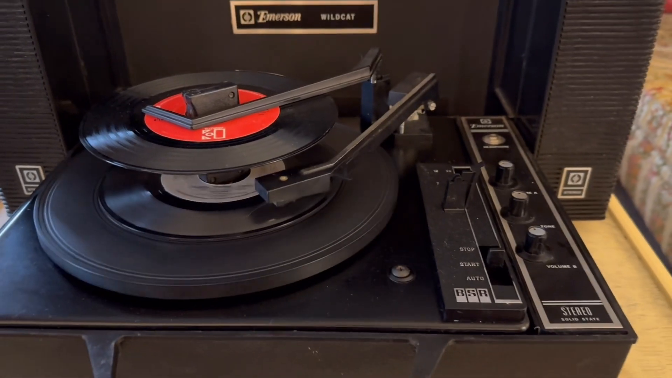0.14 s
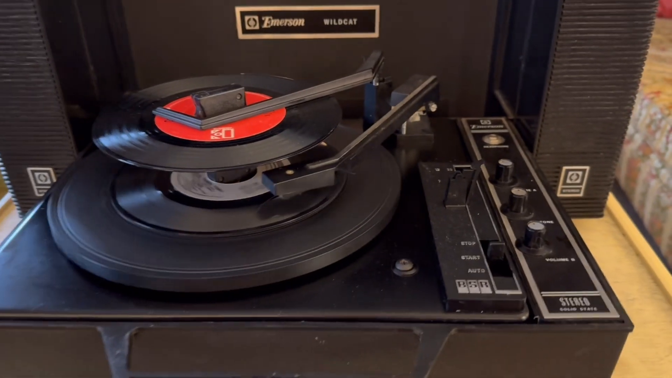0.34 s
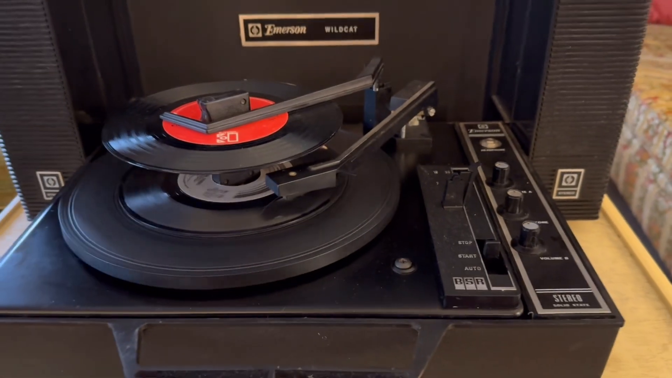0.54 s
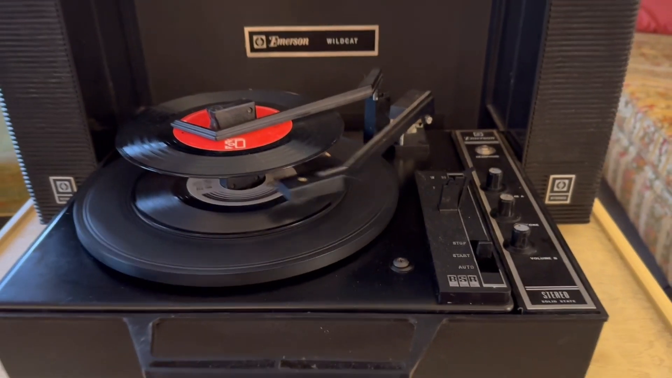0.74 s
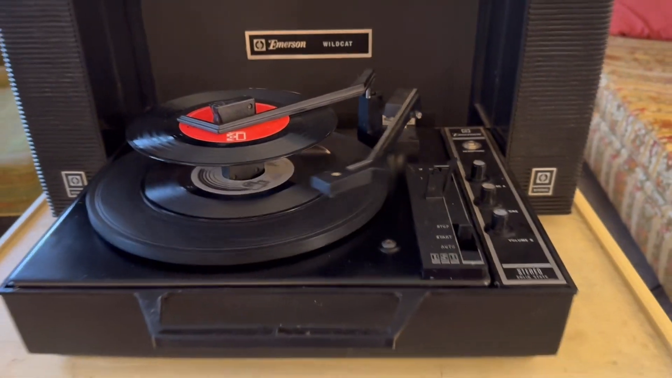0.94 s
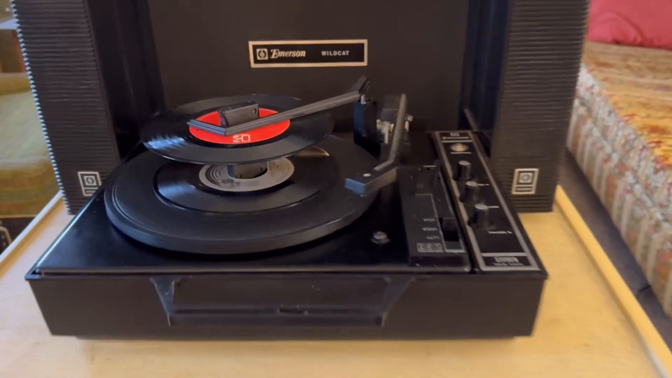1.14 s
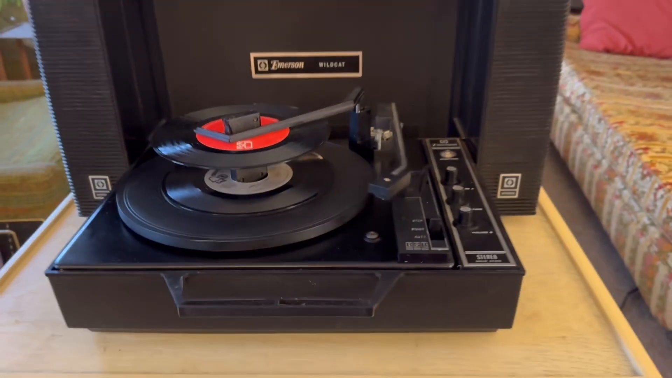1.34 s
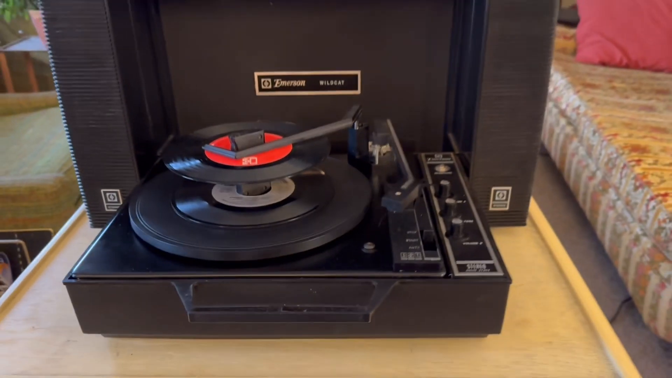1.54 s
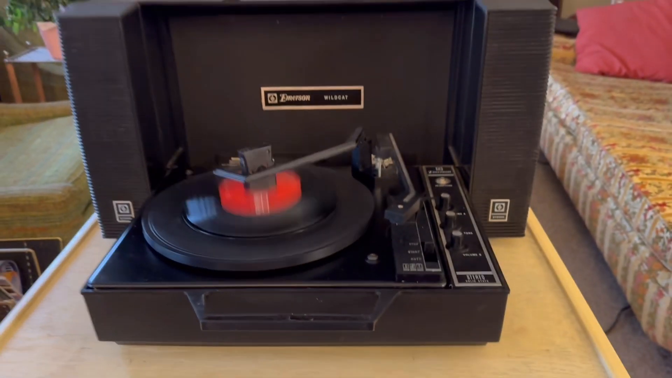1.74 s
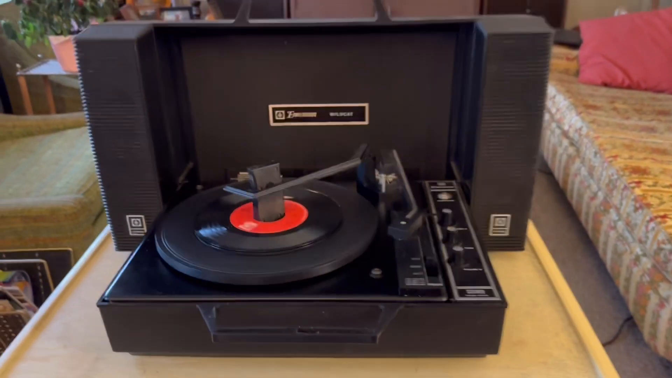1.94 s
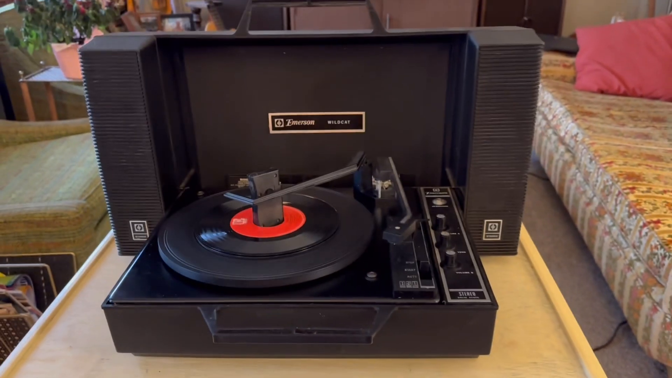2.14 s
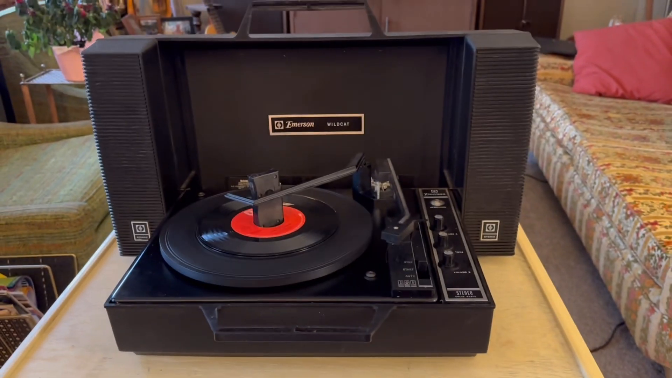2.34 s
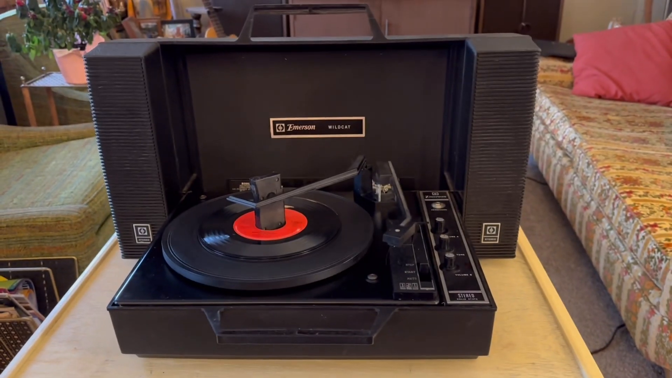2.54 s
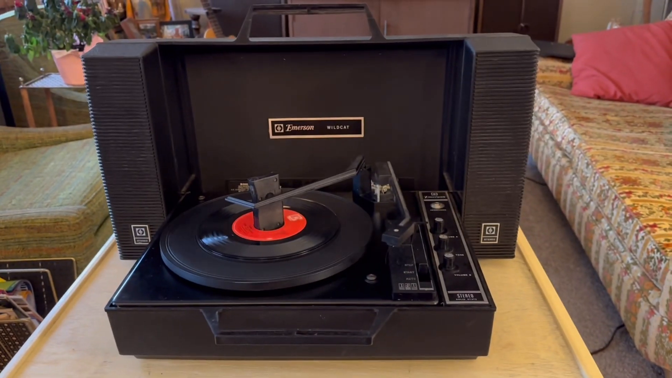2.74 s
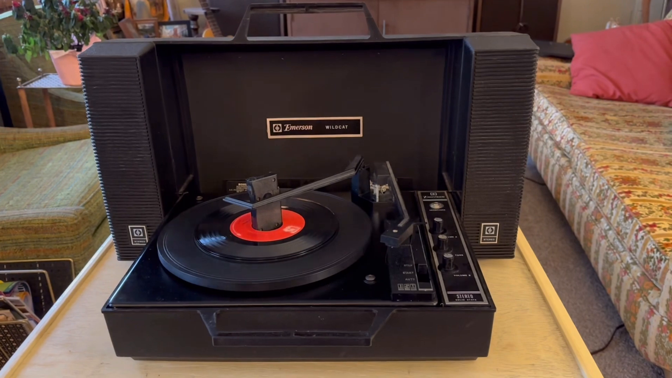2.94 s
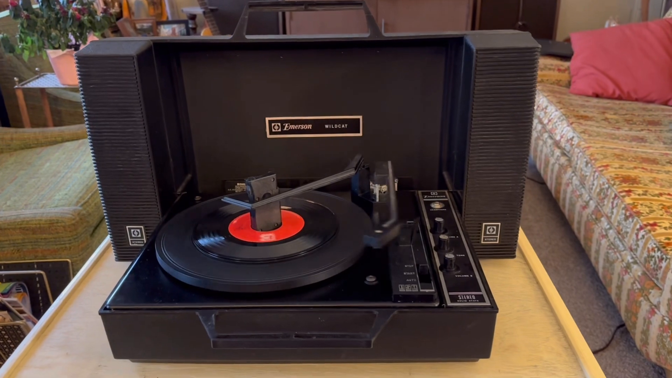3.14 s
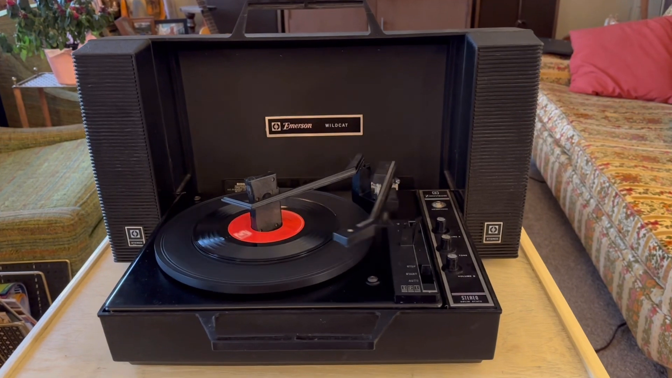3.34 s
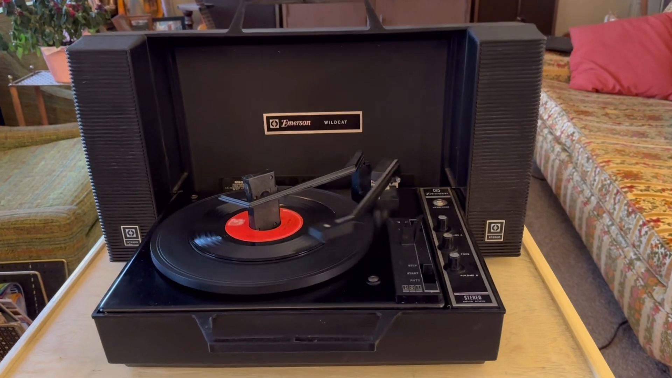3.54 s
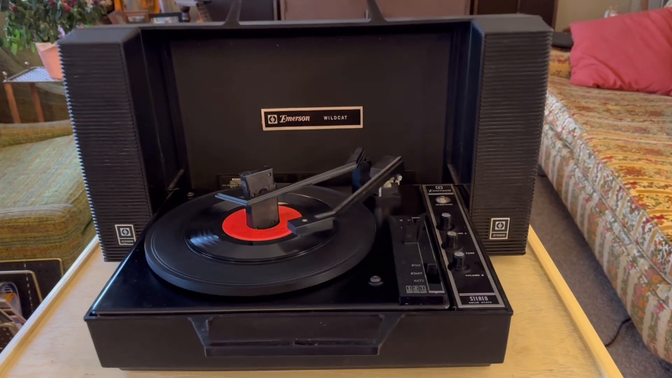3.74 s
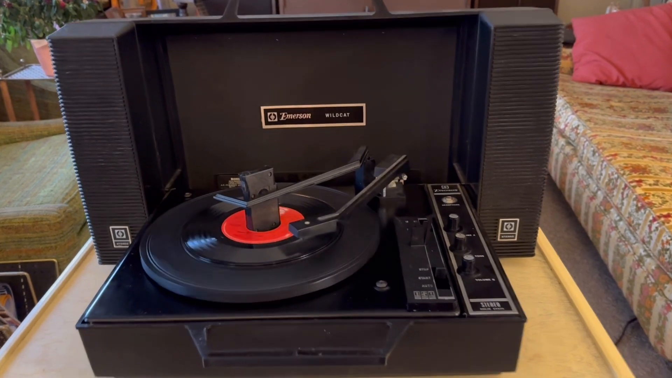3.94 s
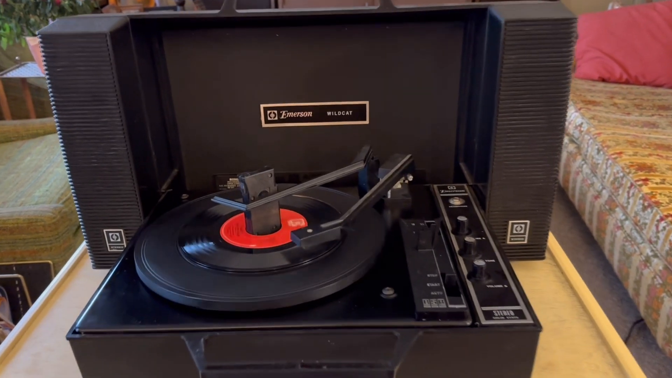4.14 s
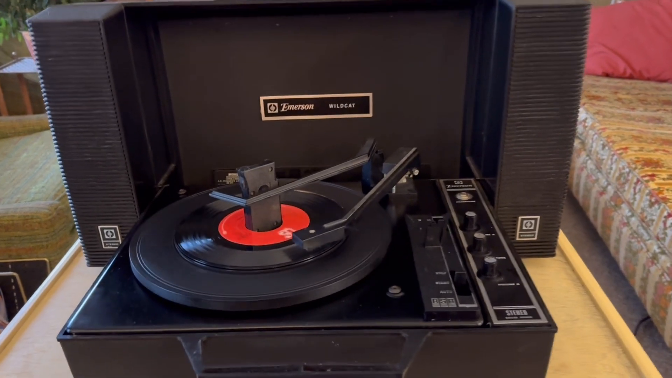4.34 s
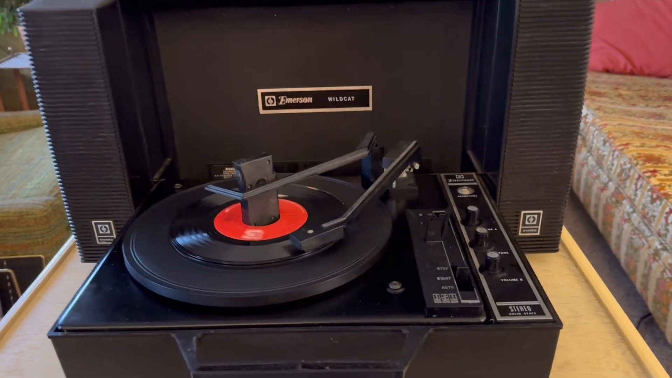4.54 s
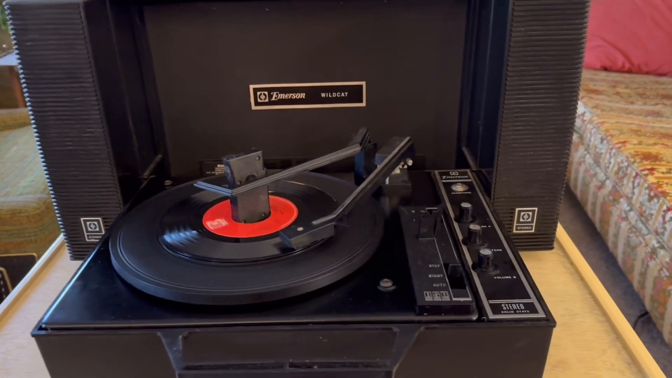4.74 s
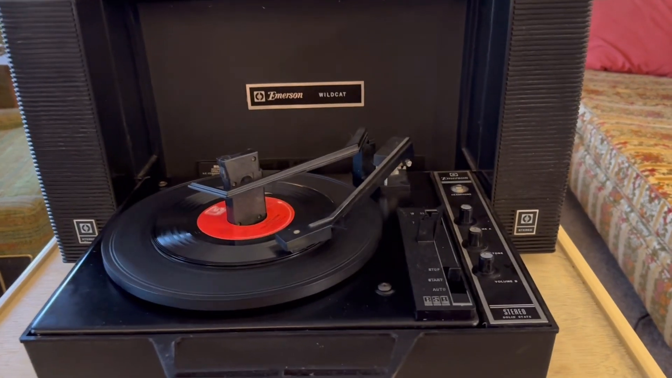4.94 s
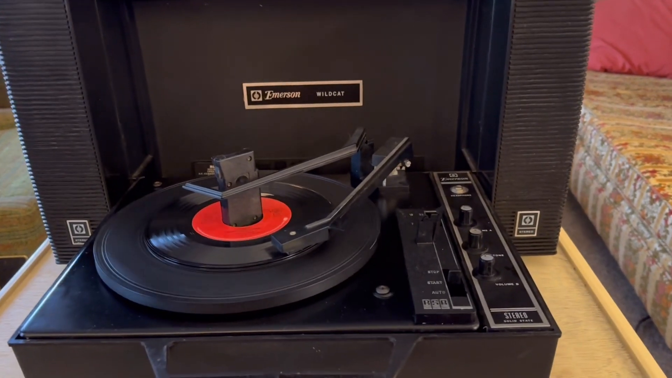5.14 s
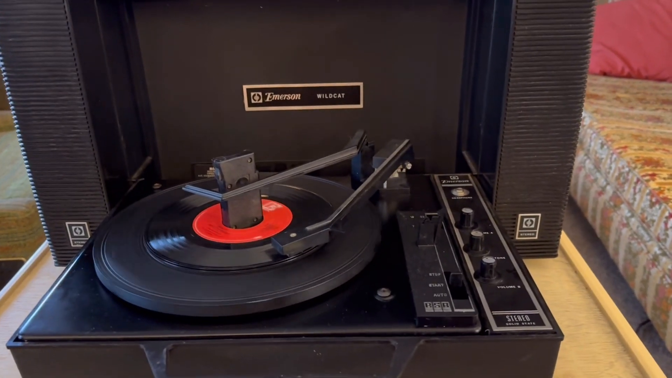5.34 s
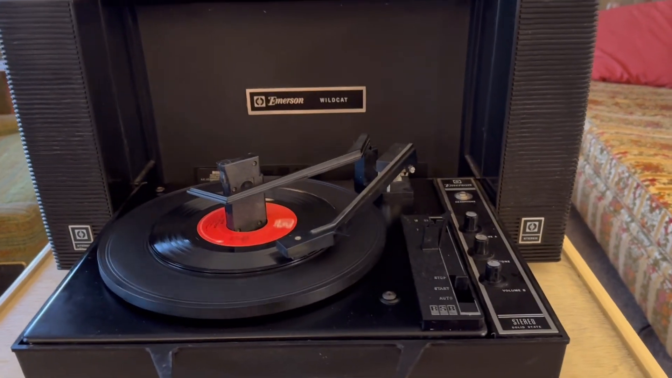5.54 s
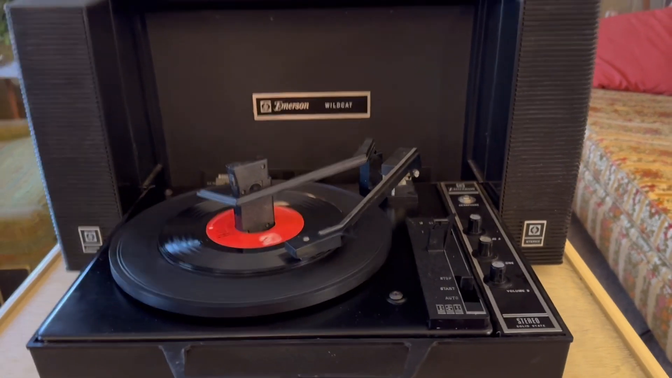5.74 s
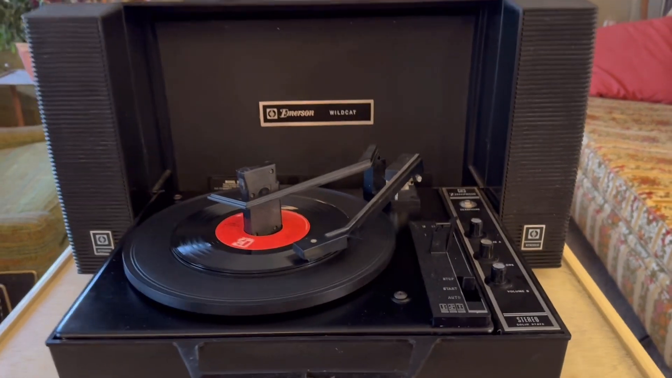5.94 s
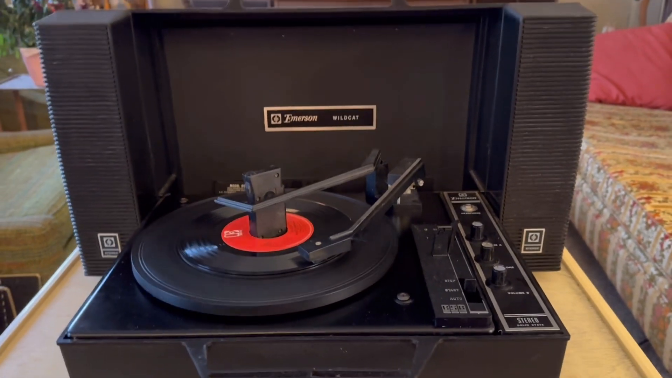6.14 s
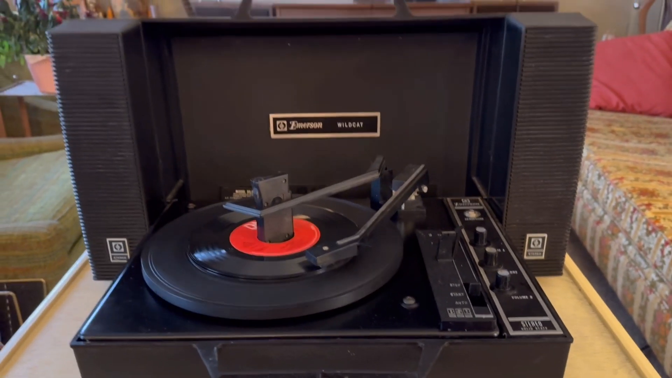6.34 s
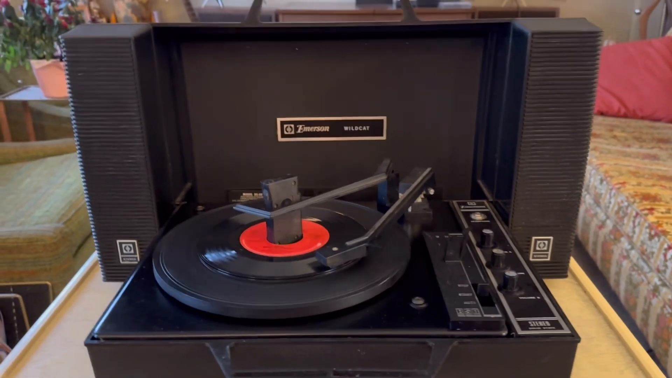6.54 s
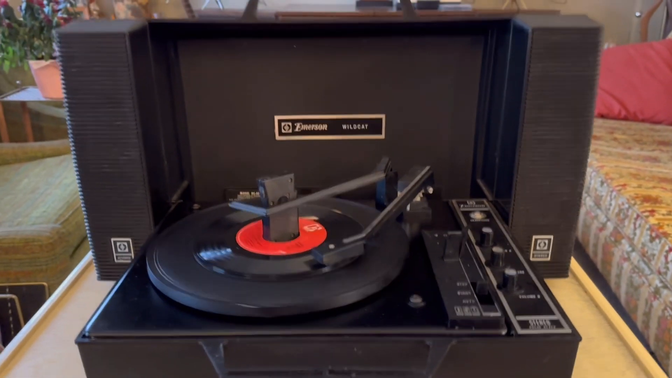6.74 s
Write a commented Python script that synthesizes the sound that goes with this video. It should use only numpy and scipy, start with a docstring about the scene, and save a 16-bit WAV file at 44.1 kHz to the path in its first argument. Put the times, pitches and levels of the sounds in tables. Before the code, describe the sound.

A record changer hums, drops a single with a loud clatter, then clicks and knocks until the stylus lands in faint crackle.

```python
"""A motor hums and its bearing hisses and whistles: a portable record changer in a living room, an arm's
length from a stereo microphone. Levers knock in the sprung deck, ringing its plate and case. A single
slaps onto the platter and chatters, the arm swings to its stop, and a gritty cam lowers it. The stylus
lands and scuffs along the lead-in groove, which hisses and crackles over the running motor."""
import sys
import numpy as np
from scipy import signal
from scipy.fft import rfft, irfft, next_fast_len
from scipy.io import wavfile
from scipy.ndimage import uniform_filter1d

SR = 44100
rng = np.random.default_rng(int(sys.argv[2]) if len(sys.argv) > 2 else 0)


def log_audio(samples):
    """Write samples as a 16-bit WAV file to the path given in sys.argv[1]."""
    # one column per channel
    frames = np.atleast_2d(samples).T
    # limit to full scale, then quantise
    limited = np.clip(frames, -1, 1)
    pcm = np.round(limited * 32767).astype(np.int16)
    wavfile.write(sys.argv[1], SR, pcm)


N = 298994
T = np.arange(N) / SR

# levers push the single off its ledge, turn the arm, stop it and drop it; hardness runs from 0 to 1:
# start_s, strength_db, hardness, thump_hz
LEVER_KNOCKS = [ (.803, -54.5, 0.73, 300), (1.037, -76, 0.9, 300), (1.5745, -43.5, 0.33, 238),
                (1.578, -40.5, 0.2, 233), (1.589, -47, 0.39, 229), (2.6707, -38.5, 0.58, 350),
                (2.676, -43, 0.38, 368), (2.699, -54, 0.31, 327), (3.067, -55, 0.45, 308),
                (3.086, -68, 0.96, 301), (3.283, -70.5, 0.9, 303.5), (3.715, -57.5, 0.28, 362.5),
                (4.081, -47, 0.6, 827), (4.087, -47, 0.77, 404), (4.094, -50, 0.24, 212),
                (4.469, -56, 0.9, 300), (4.511, -55, 1, 300), (4.555, -55, 0.27, 395),
                (4.576, -54, 0.98, 400), (4.64, -62, 0.8, 300), (4.727, -61, 1, 298),
                (4.9516, -51, 0.15, 290), (4.981, -51.5, 0.7, 300), (5.021, -49, 0.04, 235),
                (5.044, -55.5, 0.05, 240), (5.092, -56, 0.11, 260), (5.394, -57.5, 0.46, 410)]
# the single lands on the platter, then the stylus on the single; snap and plate are relative to strength:
# start_s, strength_db, hardness, thump_hz, snap_db, plate_db, clack_t60_s
LANDINGS = [ (1.6936, -40.5, 0.3, 400, -12.5, -0.5, .06), (1.7012, -33, 0.66, 290, -2, -1, 0.085),
            (1.7143, -22.5, 0.66, 640, -5.5, 3.5, 0.052), (1.718, -20.5, 0.28, 240, -19, -1.5, .06),
            (1.7276, -21.5, .63, 240, -7.5, 0, 0.068), (1.759, -36.5, 0.5, 292.2, 6, 0.5, .05),
            (1.7641, -16, 0.95, 347, -5.5, -10.5, .03), (1.773, -26, 0.7, 280, -17.5, -2, .03),
            (4.9938, -32.5, 0.44, 474, -2, -8, 0.044), (4.997, -32.5, 0.69, 1000, 2.5, -5.5, 0.096),
            (5.005, -43.5, 0.28, 302, 13, -0.5, 0.039)]
# the ledge, the single and the arm's linkage bounce:
# start_s, gap_s, first_strength_db, step_db, hardness, thump_hz, snap_db
RATTLES = [ (1.633, 0.012, -47, -4.5, 0.23, 214, -25), (1.681, 0.0047, -53.5, 4, 0.46, 290, -8.5),
           (1.795, 0.028, -44, -5, 0.95, 703, -8), (3.791, .028, -61.5, -1, 0.14, 245, -25)]
# what the case passes of a clack, and the colour of a hard contact: frequency_hz, gain_db
CASE_COLOUR = [(150, -29), (215, -1), (500, 3.5), (590, 0), (720, 5), (1400, -1), (2500, -2.5), (3300, -6),
               (5000, -4.5), (9000, -9.5)]
TICK_COLOUR = [(1200, -9), (2600, -1), (3300, -4.5), (4300, -6.5), (5400, 1), (7500, -6), (10000, 2.5),
               (13000, 0), (15500, -2)]
# modes of the deck plate and case, then of each part that sings after a blow: pitch_hz, level_db, t60_s
DECK_MODES = [(222, -9, 0.09), (242, 2, 0.085), (289, -6, 0.07), (323, -1, 0.095), (392, -16, .17),
              (454, -9, .17), (490, -17, 0.2), (525, -16, .15), (697, -7, 0.2), (866, -19, 0.2),
              (923, -7, 0.13), (979, -13, .17), (1020, -13, .14), (1060, -10, 0.14), (1135, -13, .15),
              (1328, -12, .18), (1472, -10, 0.23), (1633, -11, 0.2), (1765, -13, .13), (1888, -11, .12),
              (1995, -12, .16), (2330, -15, .16), (2480, -17, .18)]
PLATTER = [(105, -16, .6), (698, -1, .17), (770, -29.5, 1.9), (779, -37, .8)]
DISC = [(2654, 3, .03), (3068, -13.5, .25), (3380, -5.5, 0.11), (3730, -16.5, 0.19), (4270, -19, .17),
        (4960, -5, 0.051), (5290, 2, 0.038), (5828, -14.5, .1)]
CAM_LEVER = [(321, -5, 0.14), (408, 2.5, 0.14), (752, 2, 0.1), (910, -19.5, .15), (1217, -4, 0.12),
             (1557, 5, 0.03), (1790, -3, 0.13), (2330, -4, 0.063)]
TONE_ARM = [(402, -12.5, 0.22), (729, -1, 0.13), (914, -15, 0.12), (1136, -17, 0.14), (1600, -18, 0.11),
            (1980, -13, 0.06), (2120, -12, 0.06), (2837, -21, 0.078)]
PUSHER = [(1300, 2.5, 0.022), (1620, -13.5, .05)]
CARTRIDGE = [(490, -6, .15), (1260, 1, 0.083), (1450, -6, 0.095), (2350, -6, 0.078), (3278, -15, .09),
             (5600, 0, 0.085), (6940, -5, 0.089)]
PAWL = [(2840, -5, 0.033), (5270, -8, .03), (5430, -2, .025), (5860, -10, .025)]
# blows on those parts: start_s, modes, level_db
STRIKES = [(1.037, PAWL, -63), (1.573, PUSHER, -38), (1.631, PUSHER, -47), (1.719, PLATTER, -28.5),
           (1.7642, DISC, -31.5), (2.6708, CAM_LEVER, -43), (4.082, TONE_ARM, -35.5),
           (4.996, CARTRIDGE, -42), (3.086, PAWL, -69.5), (3.283, PAWL, -66)]
# the stylus scuffs the vinyl: start_s, length_s, rise_s, level_db, squeak_hz, tilt_db_per_octave
SCUFFS = [(5.088, 0.047, 0.0041, -54, 6650, 2.5), (5.156, 0.1, .01, -77, 8600, -1),
          (5.699, 0.026, 0.0088, -69.5, 8600, 4), (5.752, 0.062, 0.016, -79.5, 8650, 5),
          (5.873, 0.077, 0.02, -76.5, 8560, -9), (5.997, 0.045, 0.017, -76, 8600, 2),
          (6.413, 0.042, 0.011, -59.5, 5830, 0.5)]
# grit on the cam, then dust under the stylus: start_s, level_db, pitch_hz
POPS = [(4.751, -55, 6800), (4.768, -54, 5600), (4.851, -54, 9500), (5.547, -60, 6550), (5.79, -62, 8000),
        (6.0618, -46.5, 6900), (6.543, -55.5, 7600)]
# colours of the stylus in the groove, a dust pop and the rubbing cam: frequency_hz, gain_db
GROOVE_COLOUR = [(1200, -14), (2500, -2.5), (3900, -4), (5200, 2.5), (6600, 0), (8200, -5), (11500, -8.5),
                 (13300, -16), (15500, -25)]
POP_COLOUR = [(600, 5), (1800, 0), (3800, -21), (6800, 1.5), (9000, -11), (12000, -31), (16000, -30)]
CAM_COLOUR = [(700, 8), (1200, -2), (2100, 4), (2800, -4), (4400, -1.5), (6000, -3), (7800, -13),
              (10400, -4), (12000, -12), (13200, -10), (16000, -24)]
# motor tones: pitch_hz, level_db, waver_share
HUM_TONES = [(96, -70, 0.87), (96, -75.5, 0.41), (259.2, -60, 0.11), (327, -84, 0.6), (360.7, -79, 0.6),
             (415, -81, 0.55), (673, -85, 0.5), (727, -77.5, .6), (788, -83.5, .9)]
# load on the motor, which drives rumble and whirr: time_s, gain_db
MOTOR_LOAD = [(0, 0.5), (1.4, 0.5), (2.1, 3.5), (2.5, 0), (3.15, 2.5), (3.7, 0), (4.2, 3), (5.25, 4.5),
              (6, 4), (6.78, 3)]
# bearing resonances, hissing and whistling: pitch_hz, width_hz, level_db
BEARING_HISS = [(2843, 100, -86.5), (4860, 280, -86.5), (7100, 1100, -90.5), (10080, 730, -88),
                (13460, 5000, -89.5)]
BEARING_WHISTLE = [(2950, 50, -90), (4190, 70, -92), (4900, 110, -91), (6900, 800, -90.5), (9500, 260, -90),
                   (10300, 500, -91.5), (11180, 400, -92)]
# the hiss wanders; the whistle sinks as the cam loads the platter: time_s, gain_db
HISS_LEVEL = [(0, -1), (.7, -3), (1.05, 0.5), (1.4, -1.5), (2.1, 1), (2.6, -1), (3.1, -2), (3.35, -6),
              (3.9, -3), (4.3, 0), (4.75, 0), (5.5, -4.5), (6.3, -3), (6.78, -4.5)]
WHISTLE_LEVEL = [(0, -1.5), (.38, 0), (.72, -1), (.92, -7), (3.1, -13), (6.78, -15)]
# colours of platter rumble, motor whirr and still air: frequency_hz, gain_db
RUMBLE_COLOUR = [(10, -48), (22, -23.5), (35, -9.5), (50, 2.5), (85, 5), (125, 3), (180, -0.5), (235, 3),
                 (300, -6.5), (420, -9.5), (560, -23.5), (900, -47.5)]
WHIRR_COLOUR = [(300, -4), (520, 7.5), (760, 7.5), (900, 2), (1400, -2), (2000, -7), (3200, -21.5),
                (6000, -41.5)]
AIR_COLOUR = [(1500, 7), (4000, -1), (6500, 0.5), (8500, -3), (11000, -12), (15000, -6), (16000, -19.5)]
# the living room's decay: frequency_hz, t60_s
ROOM_DECAY = [(150, 0.28), (500, 0.3), (1500, 0.32), (4000, 0.34), (9000, 0.14), (15000, 0.17)]
# the microphone draws back, then leans in and hears less of the room: time_s, echo_db
ECHO_LEVEL = [(0, -2), (1.8, 0.5), (2.7, 2.5), (4.1, 3.5), (5, -4), (6.78, 0)]
# stereo width and left-right balance by frequency; the top treble is nearly mono:
# frequency_hz, side_minus_mid_db, left_minus_right_db
STEREO_IMAGE = [(59.57, -14.5, 2), (247.8, -10.5, 2.5), (750, -2, 2.5), (1440, -3, 6.5), (3100, -1.5, 1.5),
                (5300, -2, 5.5), (8740, 2, 1), (14260, -21, 0)]

LEFT_RIGHT = np.array([[1], [-1]])
GROOVE_FROM_S = 4.98


def deck(rise_s=.0003):
    """Each blow rings the plate's modes, with a thump, a clack of levers and plastic, and a contact snap."""
    out, t = np.zeros((2, N)), np.arange(SR * 2 // 3) / SR
    hz, db, t60 = np.transpose(DECK_MODES)
    # low modes build up more slowly; all sound a little sooner on the left
    modes = np.array([amp(d) * pan(f) * fade(t, decay, 2.5 / f)
                      * np.sin(2 * np.pi * f * (t + LEFT_RIGHT * 4e-5))
                      for f, d, decay in zip(hz, db, t60)])
    short, case, tick = t[:SR // 7], colour(CASE_COLOUR), colour(TICK_COLOUR)
    n = len(short)
    for start, db, hardness, thump_hz, snap_db, top_hz, plate_db, clack_t60 in blows():
        # a harder contact thumps less and clacks higher
        thump_db = db + between(26, -11, hardness)
        clack_hz = between(466, 1860, hardness)
        push = amp(thump_db + 1) * hump(hz, thump_hz, octaves=.45)
        push += amp(db - 11.5) * hump(hz, clack_hz, octaves=.95)
        add(out, start, amp(plate_db) * np.tensordot(push, modes, 1))
        # the first few cycles come straight from the struck part, ahead of the clatter
        ping = pan(clack_hz) * np.sin(2 * np.pi * clack_hz * short)
        add(out, start, amp(db + 3) * ping * fade(short, .01, rise_s))
        thump = noise(n, lambda f: case(f) * hump(f, .99 * thump_hz, octaves=.63), width_db=-2.5)
        clack = noise(n, lambda f: case(f) * hump(f, clack_hz, octaves=.81), width_db=-4)
        snap = noise(n, lambda f: tick(f) / (1 + (f / top_hz) ** 4), left_lead_s=1.2e-5)
        add(out, start, amp(thump_db - 10) * thump * fade(short, t60=.075, rise=.0025))
        add(out, start, amp(db - 4) * clack * fade(short, clack_t60, rise_s))
        add(out, start, amp(db + snap_db + .5) * snap * fade(short, .55 * clack_t60, rise_s))
    # the small case radiates no deep bass
    return signal.sosfilt(signal.butter(3, 150, "highpass", fs=SR, output="sos"), out)


def blows(lever_top_hz=5960, lever_plate_db=-1.5, lever_t60_s=.08, rattle_t60_s=.06):
    """Contacts: start_s, strength_db, hardness, thump_hz, snap_db, top_hz, plate_db, clack_t60_s."""
    top_hz = lambda snap_db: 14200 * 2 ** (snap_db / 12)  # a weaker snap is also duller
    for start, db, hardness, hz in LEVER_KNOCKS:
        snap_db = between(-36, -5, hardness)
        yield start, db, hardness, hz, snap_db, lever_top_hz, lever_plate_db, lever_t60_s
    for start, db, hardness, hz, snap_db, plate_db, t60 in LANDINGS:
        yield start, db, hardness, hz, snap_db, top_hz(snap_db), plate_db, t60
    for start, gap, db, step_db, hardness, hz, snap_db in RATTLES:
        for k in range(4):
            yield start + k * gap, db + k * step_db, hardness, hz, snap_db, top_hz(snap_db), 0, rattle_t60_s


def ringing_parts():
    """Struck parts ring on in their own modes, each building up over a cycle or so."""
    out, t = np.zeros((2, N)), np.arange(SR * 3 // 2) / SR
    for start, modes, level_db in STRIKES:
        for hz, db, t60 in modes:
            ring = fade(t, t60, rise=1.4 / hz) * np.sin(2 * np.pi * hz * t)
            add(out, start, amp(level_db + db) * pan(hz) * ring)
    return out


def stylus(release_s=.011, squeak_db=-6, rasp_db=-2.5):
    """The stylus scuffs grainily along the lead-in groove, with a slight squeak and a rasp from the cone."""
    out, t = np.zeros((2, N)), np.arange(SR // 4) / SR
    for start, length, rise, db, squeak_hz, tilt_db in SCUFFS:
        contact = (1 - np.exp(-(t / rise) ** 2)) * np.exp(-np.maximum(t - length, 0) / release_s)
        scrape = noise(len(t), lambda f: colour(GROOVE_COLOUR)(f) * amp(tilt_db * np.log2(1 + f / 1000)))
        squeak = noise(len(t), lambda f: hump(f, squeak_hz, octaves=.12))
        rasp = noise(len(t), lambda f: hump(f, 610, octaves=1))
        add(out, start, amp(db) * contact * (scrape + amp(squeak_db) * squeak + amp(rasp_db) * rasp))
    return out * amp(2 * walk(700) + 2 * walk(170))


def dust(specks_per_s=40, crackle_db=-76, spread_db=3.2):
    """Single dry pops of grit and dust, and a fine crackle once the stylus is in the groove."""
    out, t = np.zeros((2, N)), np.arange(SR // 30) / SR
    for start, db, hz in POPS:
        pop = noise(len(t), lambda f: colour(POP_COLOUR)(f * 6800 / hz))  # treble peak moved to hz
        add(out, start, amp(db + 2.5) * pop * fade(t, t60=.0068, rise=.0001))
    specks = (rng.random(N) < specks_per_s / SR) * (T > GROOVE_FROM_S)
    sizes = amp(crackle_db + spread_db * np.minimum(rng.exponential(size=N), 3))
    tick = noise(len(t), colour(GROOVE_COLOUR)) * fade(t, t60=.005, rise=.0001)
    return out + signal.fftconvolve([specks * sizes], tick, axes=1)[:, :N]


def motor(shaft_hz=56.2, throb=.13):
    """Wavering hum and platter rumble, with a whirr and a hissing bearing that pulse at each shaft turn."""
    load, whistle_gain = gain_curve(MOTOR_LOAD), gain_curve(WHISTLE_LEVEL)
    hum = 0
    for hz, db, waver in HUM_TONES:
        sag = whistle_gain ** .1 if hz > 600 else 1  # the higher tones sink with the whistle
        wobble = 1 + waver * (walk(3.9) + 1j * walk(9.1))
        tone = np.real(wobble * np.exp(2j * np.pi * hz * T)) * np.sqrt(2 / (1 + 2 * waver ** 2))
        hum += amp(db) * sag * pan(hz) * tone
    turn = 1 + throb * np.cos(2 * np.pi * shaft_hz * T + .3 * walk(3))
    rumble = amp(-58.5 + .63 * walk(9.5)) * noise(N, colour(RUMBLE_COLOUR))
    whirr = amp(-74 + walk(22)) * noise(N, colour(WHIRR_COLOUR))
    hiss = gain_curve(HISS_LEVEL) * bearing(BEARING_HISS, flutter_db=1)
    whistle = whistle_gain * bearing(BEARING_WHISTLE, flutter_db=2.5)
    return hum + load * (rumble + turn * whirr) + turn * (hiss + whistle)


def bearing(resonances, flutter_db):
    """Friction noise through the bearing's resonances, each fluttering quickly on its own."""
    return sum(amp(db + flutter_db * walk(13)) * noise(N, lambda f: 1 / (1 + (2 * (f - hz) / width) ** 2))
               for hz, width, db in resonances)


def cam_rub(grain, full_s=4.647, hold_s=.18, rise_db_per_s=91, fall_db_per_s=43.5, specks_per_s=60):
    """The cam's gritty rub swells, holds while the arm sinks, and dies away."""
    before, after = np.maximum(full_s - T, 0), np.maximum(T - full_s - hold_s, 0)
    rub = amp(-66 - rise_db_per_s * before - fall_db_per_s * after) * noise(N, colour(CAM_COLOUR))
    # each speck of grit catches for about a millisecond
    specks = (rng.random(N) < specks_per_s / SR) * rng.uniform(3, 10, N)
    grit = signal.lfilter([1], [1, -np.exp(-1 / (.0003 * SR))], specks)
    return rub * (grain + amp(-9.5) * grit)


def groove_hiss(grain, rise_s=.46, swish_peak_s=5.78, half_turn_s=.59):
    """The groove hisses as the stylus settles, swishing with each half turn of the warped single."""
    swish_db = 2.5 * np.cos(2 * np.pi * (T - swish_peak_s) / half_turn_s)
    settled = np.clip((T - GROOVE_FROM_S) / rise_s, 0, 1)
    return amp(-77.5 + swish_db) * settled * grain * noise(N, colour(GROOVE_COLOUR))


def disc_slip(start_s=1.8, end_s=2.36, level_db=-76, fall_db_per_s=12, pitch_hz=3300):
    """The dropped single scrapes lightly on the platter until it turns at full speed."""
    sliding = np.clip(np.minimum(T - start_s, end_s - T) / .03, 0, 1)
    rub = noise(N, lambda f: hump(f, pitch_hz, octaves=.6)) * amp(2.5 * walk(120))
    return amp(level_db - fall_db_per_s * np.maximum(T - start_s, 0)) * sliding * rub


def arm_pivot(start_s=4.14, end_s=5.6, level_db=-77, pitch_hz=1160):
    """The arm's pivot rubs faintly while the cam holds it against the stop."""
    pressing = np.clip(np.minimum(T - start_s, end_s - T) / .034, 0, 1)
    rub = noise(N, lambda f: hump(f, pitch_hz, octaves=.15)) * amp(2 * walk(40))
    return amp(level_db) * pressing * rub


def still_air(level_db=-83):
    """Room tone: a faint, even hiss behind the changer."""
    return amp(level_db) * noise(N, colour(AIR_COLOUR))


def living_room(direct, wet_db=-9.5, build_s=.0049, bass_db=-2):
    """Adds diffuse echoes that build quickly and lose their top first; furniture soaks up some bass."""
    t = np.arange(SR // 2) / SR
    f = np.arange(len(t) // 2 + 1) * SR / len(t)
    mid, side = rfft(rng.standard_normal((2, len(t))))
    alike = np.exp(-(f / 750) ** 2)  # the bass is alike left and right
    echoes = (mid * np.sqrt(1 + alike) + LEFT_RIGHT * side * np.sqrt(1 - alike)) * amp(bass_db * alike)
    centres = np.geomspace(125, 16000, num=8)
    tail = 0
    for hz, share in zip(centres, np.eye(len(centres))):
        band = irfft(echoes * np.interp(np.log(f + 1), np.log(centres), share), len(t))
        tail += band * fade(t, on_log(ROOM_DECAY, hz)[0], build_s)
    tail *= amp(wet_db) / np.sqrt(np.sum(tail ** 2) / 2)
    return direct + signal.fftconvolve(direct * gain_curve(ECHO_LEVEL), tail, axes=1)[:, :N]


def noise(n, shape, width_db=0, left_lead_s=0):
    """Coloured stereo noise near unit level, its width and balance set by frequency."""
    size = next_fast_len(n)
    f = np.arange(size // 2 + 1) * SR / size
    mid, side = rfft(rng.standard_normal((2, size)))
    side_gain = amp(on_log(STEREO_IMAGE, f)[0] + width_db)
    lead = np.exp(1j * np.pi * LEFT_RIGHT * f * left_lead_s)
    stereo = (mid + LEFT_RIGHT * side * side_gain) * pan(f) * lead
    gain = shape(f)
    return irfft(stereo * gain / np.sqrt(np.mean(gain ** 2)), size)[:, :n]


def pan(hz):
    """Left and right gains at a frequency."""
    return amp(LEFT_RIGHT * on_log(STEREO_IMAGE, hz)[1] / 2)


def amp(db):
    """Decibels to gain."""
    return 10 ** (np.asarray(db) / 20)


def on_log(table, hz):
    """The columns of a frequency table, read at hz."""
    f, *columns = np.transpose(table)
    return [np.interp(np.log(np.maximum(hz, 1)), np.log(f), c) for c in columns]


def gain_curve(table):
    """Gain against time from rows of time_s, gain_db."""
    return amp(np.interp(T, *np.transpose(table)))


def colour(table):
    """Gain against frequency from rows of frequency_hz, gain_db."""
    return lambda f: amp(on_log(table, f)[0])


def hump(f, hz, octaves):
    """A bell on the log-frequency axis."""
    return np.exp(-.5 * (np.log2(np.maximum(f, 1) / hz) / octaves) ** 2)


def walk(rate):
    """Smooth random drift of spread near 1, changing about rate times a second."""
    k = int(SR / rate)
    held = np.repeat(rng.standard_normal(N // k + 2), k)[rng.integers(k):]
    return np.sqrt(2) * uniform_filter1d(uniform_filter1d(held, k), k)[:N]


def fade(t, t60, rise):
    """Quick swell and exponential decay."""
    return (1 - np.exp(-t / rise)) * amp(-60 * t / t60)


def between(soft, hard, hardness):
    """A value between those of the softest and the hardest contact."""
    return soft + np.clip(hardness, 0, 1) * (hard - soft)


def add(out, start_s, x):
    """Mix x into out from start_s."""
    i = max(int(start_s * SR), 0)
    out[:, i:i + x.shape[1]] += x[:, :N - i]


def scene():
    """At arm's length: blows, scuffs and pops echo in the room; ringing and running sounds arrive direct."""
    foreground = living_room(deck() + stylus() + dust()) + ringing_parts()
    running = disc_slip() + motor() + arm_pivot()
    grain = amp(walk(600) - 3.5)  # fine roughness shared by cam and groove
    return foreground + running + cam_rub(grain) + groove_hiss(grain) + still_air()


def record(dry, top_hz=15800):
    """The recorder cuts the top treble steeply."""
    return signal.sosfilt(signal.ellip(10, .2, 80, top_hz, fs=SR, output="sos"), dry)


dry = scene()
out = record(dry)
log_audio(out)
```